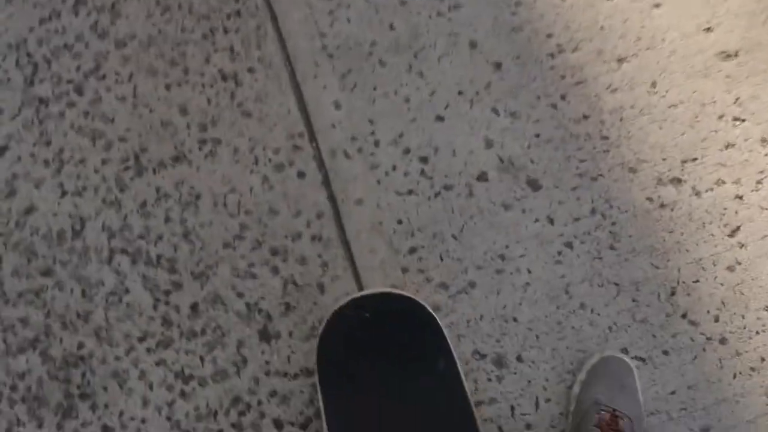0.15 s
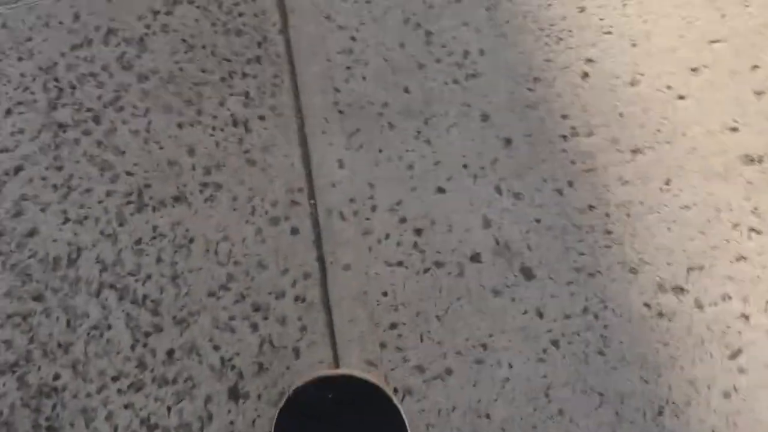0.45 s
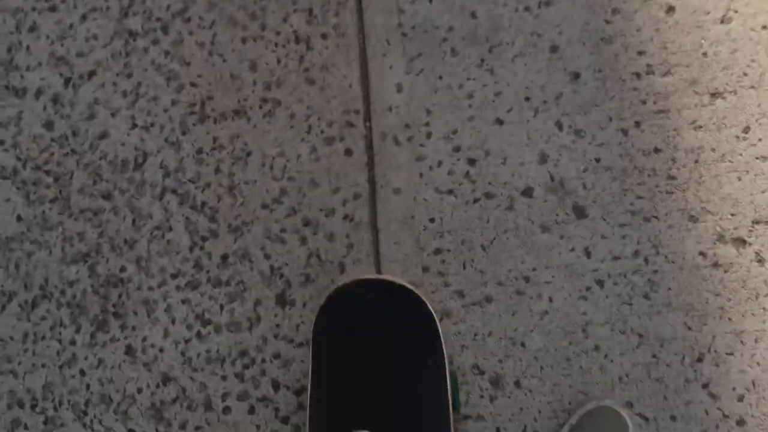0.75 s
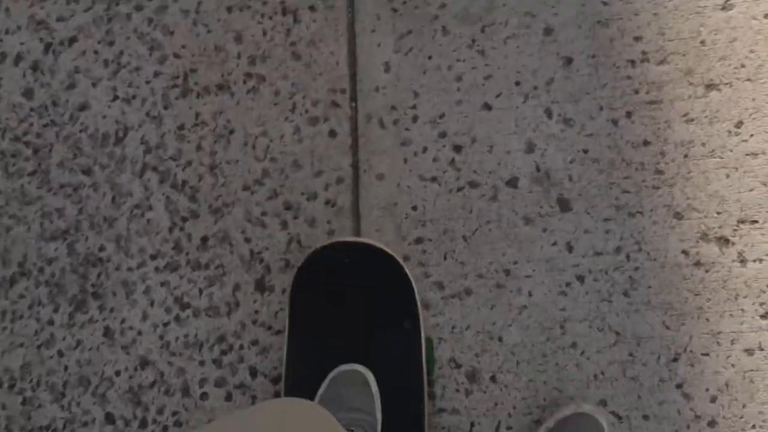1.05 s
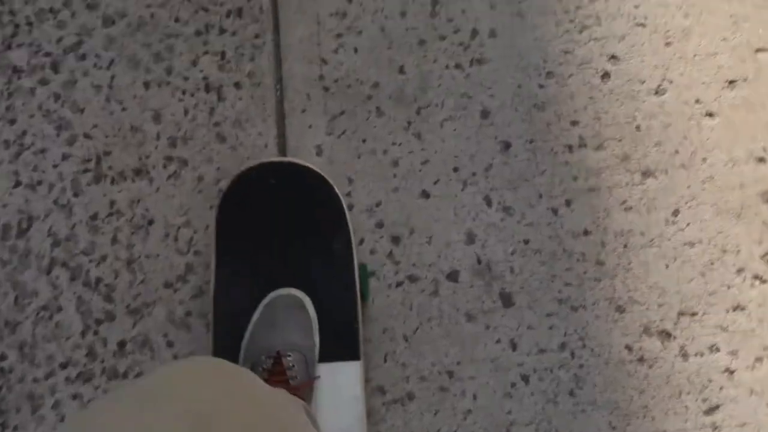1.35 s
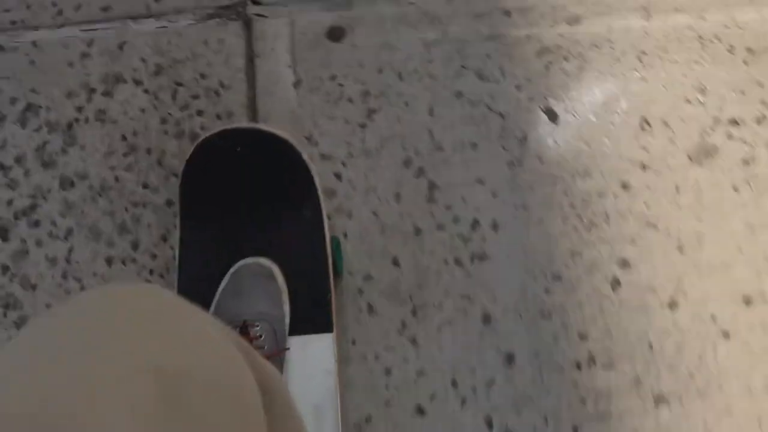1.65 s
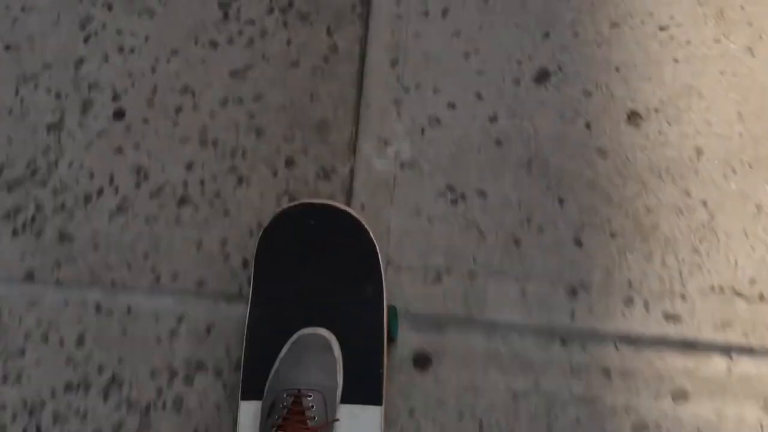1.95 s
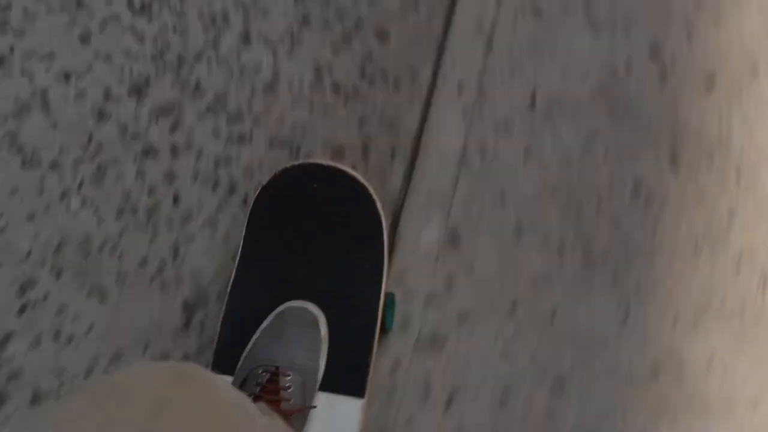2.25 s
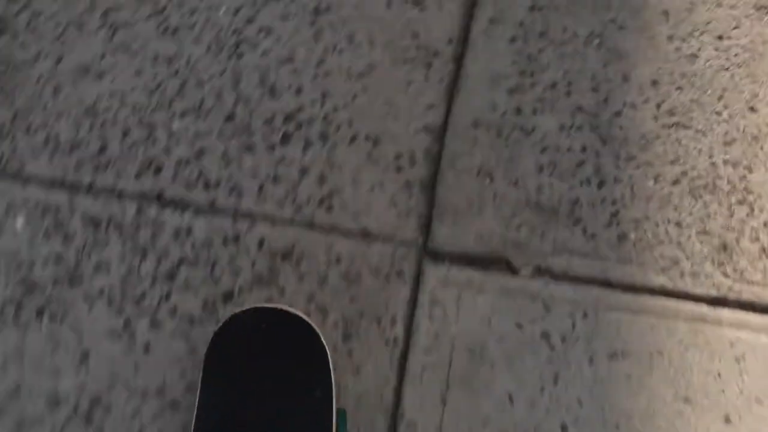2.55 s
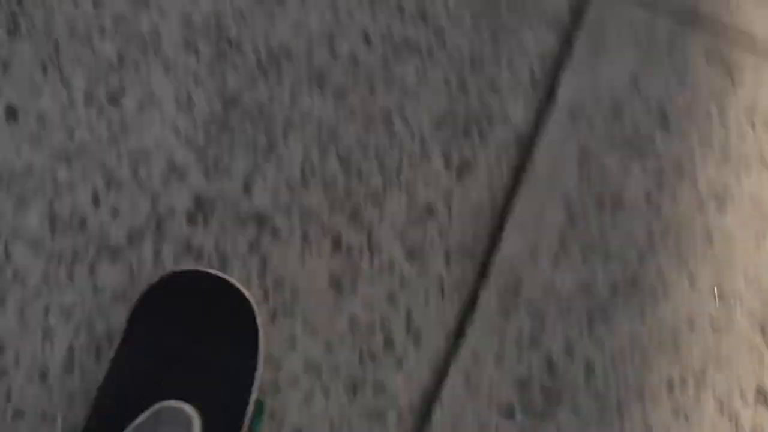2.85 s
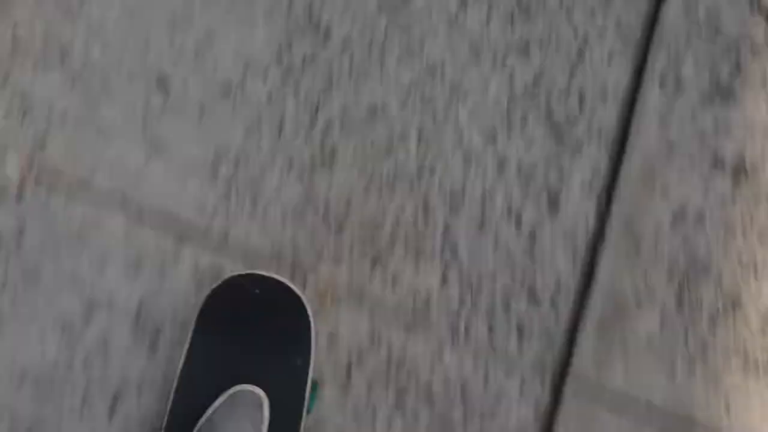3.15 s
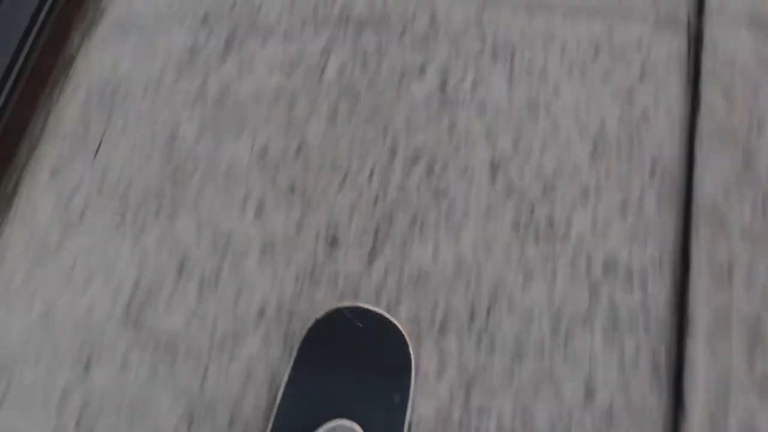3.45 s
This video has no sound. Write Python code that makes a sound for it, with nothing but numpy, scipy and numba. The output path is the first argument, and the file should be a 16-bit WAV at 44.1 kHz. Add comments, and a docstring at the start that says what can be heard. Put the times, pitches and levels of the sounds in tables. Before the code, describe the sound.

A skateboard rolls on pebbly concrete, heard close and dry from the rider's hand: steady low rumble, ringing wheel clatter, fine hiss, irregular stone rattles, hollow deck knocks and small metal pings. Two loud woody clacks, at 2.05 and 2.26 seconds, cross a slab joint. Rolling nearly fades, with a soft double bump around 2.55, then swells coarser and duller from 2.7, peaking near 3.2; a faint rising squeak starts at 3.55.

```python
"""Pebbly concrete paving: a skateboard rolls over it, heard from the rider's hand.
Random grit contacts, filtered, shake the deck, ring the wheels and hiss; stones make short rattles.
Pits knock hollow deck modes; the trucks ping. Both axles clack over a slab joint, a smooth slab
passes quietly with a soft bump, then coarser, duller paving follows; a squeak rises at the end."""
import sys
import numpy as np
from scipy import signal
from scipy.fft import rfft, irfft
from scipy.io import wavfile
from scipy.ndimage import uniform_filter1d
from numba import njit

SR = 44100
rng = np.random.default_rng(int(sys.argv[2]) if len(sys.argv) > 2 else 0)


def log_audio(samples):
    """Write samples as a 16-bit WAV file to the path given in sys.argv[1]."""
    # one column per channel
    frames = np.atleast_2d(samples).T
    # limit to full scale, then quantise
    limited = np.clip(frames, -1, 1)
    pcm = np.round(limited * 32767).astype(np.int16)
    wavfile.write(sys.argv[1], SR, pcm)


N = 158760

# Rolling level before gains and jolts. Each row: time in seconds, rumble in dB, deck in dB, wheels in dB.
ROLL_LEVELS = [(0, -26, -26, -25), (0.5, -25, -26.5, -22.5), (0.75, -25, -28.5, -23.5),
               (0.95, -24.5, -30.5, -27.5), (1.15, -22.5, -27, -26.5), (1.5, -21.5, -26.5, -27.5),
               (2.03, -20.5, -27, -25), (2.1, -30, -33.5, -36), (2.2, -27, -25, -33),
               (2.33, -31.5, -35, -42), (2.47, -36, -45, -44), (2.6, -29.5, -36.5, -39.5),
               (2.72, -26.5, -27, -33), (2.86, -24, -21.5, -31.5), (3.03, -23.5, -34, -34.5),
               (3.2, -18, -15.5, -28.5), (3.36, -23.5, -27, -35.5), (3.6, -22, -24.5, -34.5)]
# Gain added to the rolling levels: rumble, deck and wheels in dB.
ROLL_GAINS_DB = (-1, 0, -3)
# Stones and pits. Each row: start in seconds, rumble in dB, deck in dB, wheels in dB, rattle decay in seconds.
STONES = [(0.101,-37,-25.5,-31,0.0077),(0.64,-19,-30,-18.5,0.029),(.713,-19.5,-28,-22.5,0.0085),(0.726,-40,-24.5,-20,0.015),(0.868,-22.5,-19.5,-20.5,0.011),(1.264,-24,-17.5,-20,0.014),(1.378,-50,-17.5,-37,0.013),(1.434,-21.5,-19,-22.5,0.012),(1.534,-23,-14,-42,0.0089),(1.595,-38,-17,-29,0.0047),(1.67,-21,-16.5,-26.5,0.031),(1.876,-46,-26,-20.5,0.013),(2.135,-42,-25,-34,0.006),(2.5,-60,-35,-43,0.012),(2.646,-31,-21.5,-41.5,0.0068),(2.767,-23,-17,-28,0.024),(2.892,-15,-14,-31,0.042),(3.137,-16.5,-22,-37,0.0046),(3.166,-16.5,-17.5,-25,0.032),(3.21,-25,-14,-31,0.018),(3.269,-22,-17,-25.5,0.016),(3.3,-15.5,-15,-31,0.014),(3.404,-50,-19,-38.5,0.0089),(3.453,-35,-16,-35,0.016),(3.477,-33,-22,-37,0.0046)]
# Slab joint, front then rear axle. Each row: start in seconds, level in dB, knock pitch in Hz,
# crack in dB relative to the body.
JOINT = [(2.0475, 5.5, 485, -20), (2.2593, 3.5, 675, -23.5)]
# Board modes beside the knock at a joint. Each row: pitch in Hz, T60 in seconds, level in dB.
BOARD_MODES = [(247.5, 0.15, -17.5), (325, 0.083, -13.5), (430, 0.089, -20.5), (585, 0.058, -13),
               (869, 0.066, -22.5), (1230, 0.04, -16), (2400, 0.024, -27)]
# Rumble colour on the near slab. Each row: frequency in Hz, gain in dB.
NEAR_RUMBLE = [(52, -11), (70, 0.5), (90, -5.5), (165, 4.5), (228, 2), (275, -2.5), (400, -5.5), (560, -12)]
# Rumble colour of the paving beyond the joint. Each row: frequency in Hz, gain in dB.
FAR_RUMBLE = [(50, -18.5), (100, -0.5), (180, 0), (275, 2), (360, -2.5), (470, 2), (600, -15)]
# Deck colour. Each row: frequency in Hz, gain in dB.
DECK = [(250, -30.5), (400, -11.5), (480, -0.5), (560, -1.5), (635, 3), (740, -2), (880, -7), (1050, -11.5),
        (1400, -30)]
# Wheel colour. Each row: frequency in Hz, gain in dB.
WHEEL = [(600, -33.5), (940, 2.5), (1100, 8), (1380, 4.5), (1620, 2), (1785, -3.5), (2070, -0.5),
         (2300, -6.5), (2570, -7.5), (3100, -15.5)]
# Hiss colour. Each row: frequency in Hz, gain in dB.
HISS = [(1500, 9), (2800, 7.5), (3600, 4), (4600, -1), (6500, -4), (11500, -19), (13200, -36)]
# Wheel resonance centres before random wander. Each row: time in seconds, lower in Hz, upper in Hz.
WHEEL_CENTRES = [(0, 1524, 2020), (.28, 1490, 1860), (.5, 1234, 1720), (1.3, 1304, 1780), (1.8, 960, 1726)]
# Stereo width. Each row: frequency in Hz, side relative to mid in dB.
WIDTH = [(150, -58), (700, -35), (1400, -25), (2600, -13.5), (8000, 1.5), (14000, 12)]
# Metal pings of the trucks. Each row: start in seconds, pitch in Hz, level in dB.
PINGS = [(0.496, 1860, -13), (0.729, 1820, -8), (0.869, 3830, -22), (1.264, 1940, -12), (1.877, 1750, -5),
         (2.398, 1660, -37), (2.501, 1730, -27.5), (2.581, 1770, -31), (2.694, 1790, -24)]
# Squeak: base pitch in Hz, level in dB.
SQUEAK = (410, -31.5)
# Squeak partials. Each row: multiple of the base pitch, level in dB relative to the squeak.
SQUEAK_PARTIALS = [(3, 1), (5, -1.5), (6, -12)]
# Soft low bump on the smooth slab: pitch in Hz, T60 in seconds, level in dB.
BUMP = (114, 0.067, -16.5)
# Hollow deck knocks over small pits. Each row: start in seconds, level in dB, pitch in Hz.
KNOCKS = [(0.807, -10.5, 720), (1.08, -11.5, 480), (1.626, -9, 610), (3.239, -8.5, 720)]

GRIT_PER_S, GRIT_SPREAD_DB = 2600, 1
FINE_GRIT_PER_S, FINE_SPREAD_DB = 12000, 1
STONE_GRIT_PER_S, STONE_SPREAD_DB = 3000, 3.3
TICKS_PER_S, TICK_SPREAD_DB = 430, 2.8
JOLT_PER_S, JOLT_RMS_DB = 77, 1.5
STRIKE_AMPLITUDE = 0.21  # first blow; the chatter that follows has unit energy
STRIKE_S = 0.022  # time over which a stone's level is taken
HISS_DB, STONE_HISS_DB = -11, -13  # relative to the wheels
RESONANCE_WIDTH_HZ = 75.0  # wheels and deck
WHEEL_WANDER_RMS, WHEEL_WANDER_PER_S = 0.04, 32  # log pitch, steps per second
UPPER_RING_DB = -3  # relative to the lower resonance
WHEEL_RING_DB, WHEEL_RING_FADE_DB_PER_S = 4, 3  # ring relative to clatter, at time zero
DECK_RING_HZ, DECK_RING_DB = 620, -5.5  # centre; level relative to the deck body
DECK_WANDER_RMS, DECK_WANDER_PER_S = 0.17, 11  # log pitch, steps per second
KNOCK_T60_S, HOLLOW_T60_S, PING_T60_S = 0.023, 0.055, 0.031
SECOND_WHEEL_S, SECOND_WHEEL_DB = 0.0098, -8  # relative to the axle's first wheel
BUMP_S, BUMP_REBOUND_S, BUMP_REBOUND_DB = 2.535, 0.0542, -5  # start, then rebound after it
SQUEAK_S, SQUEAK_SWELL_S, SQUEAK_RISE_PER_S = 3.555, 0.028, 0.62  # rise is a share of base pitch
SKIRT_DB_PER_OCT = 12.5  # fall above a colour's last point
CLIP_LEVEL, TOP_HZ = 1.0, 12800


def undb(db):
    """Amplitude from dB."""
    return 10 ** (np.asarray(db) / 20)


def unit(x):
    """Scale to an RMS of 1."""
    return x / np.sqrt(np.mean(x ** 2) + 1e-18)


def curve(rows, axis=1):
    """One table column interpolated over time."""
    rows = np.array(rows)
    return np.interp(np.arange(N) / SR, rows[:, 0], rows[:, axis])


def response(points, size=4096):
    """Minimum-phase impulse response of a colour, by folding its cepstrum."""
    hz, db = np.array(points).T
    f = np.maximum(np.arange(size // 2 + 1) * SR / size, 1)
    skirt_db = SKIRT_DB_PER_OCT * np.maximum(np.log2(f / hz[-1]), 0)
    gain_db = np.interp(np.log(f), np.log(hz), db) - skirt_db
    cepstrum = irfft(np.log(undb(gain_db)))
    cepstrum[1:size // 2] *= 2
    cepstrum[size // 2 + 1:] = 0
    return irfft(np.exp(rfft(cepstrum)))


def through(x, impulse_response):
    """Filter, keeping the input length."""
    return signal.fftconvolve(x, impulse_response)[:len(x)]


def walk(steps_per_s):
    """Random levels, each held one step and slewed to the next; RMS 1."""
    step = max(int(SR / steps_per_s), 2)
    held = rng.standard_normal(N)[np.arange(N) // step]
    return unit(uniform_filter1d(held, step))


def add(out, start_s, sound):
    """Mix a sound in at its start, cut at the end of the scene."""
    i = max(int(start_s * SR), 0)
    out[i:i + len(sound)] += sound[:N - i]


@njit
def resonate(x, hz, width_hz):
    """State-variable band-pass with a moving centre."""
    y, band, low = np.empty(len(x)), 0., 0.
    for i in range(len(x)):
        g = np.tan(np.pi * hz[i] / SR)
        k = width_hz / hz[i]
        v = (band + g * (x[i] - low)) / (1 + g * (g + k))
        band = 2 * v - band
        low = low + 2 * g * v
        y[i] = k * v
    return y


def ring(hz, t60_s, size=6000):
    """One exponentially decaying mode."""
    t = np.arange(size) / SR
    return -np.sin(2 * np.pi * hz * t) * np.exp(-np.log(1000) * t / t60_s)


def soft_ring(hz, t60_s):
    """A mode with its onset softened by subtracting a ten times shorter one."""
    return ring(hz, t60_s) - ring(hz, t60_s / 10)


def grit(per_s, spread_db, size):
    """Tiny contacts at random moments with random sign, a few much harder than the rest."""
    touch = rng.random(size) < per_s / SR
    force = undb(spread_db * np.minimum(rng.exponential(size=size), 5))
    return unit(touch * force * np.sign(rng.standard_normal(size)))


def truck_pings():
    """Truck metal pings and ticks: one short decaying mode each."""
    out = np.zeros(N)
    for start_s, hz, db in PINGS:
        add(out, start_s, undb(db) * ring(hz, PING_T60_S))
    return out


def wheel_squeak():
    """A wheel squeak: harmonic partials that swell and rise in pitch."""
    out, t = np.zeros(N), np.arange(N) / SR
    base_hz, db = SQUEAK
    hz = base_hz * (1 + SQUEAK_RISE_PER_S * (t - SQUEAK_SWELL_S))
    phase = 2 * np.pi * np.cumsum(hz) / SR
    tone = sum(undb(partial_db) * np.sin(k * phase) for k, partial_db in SQUEAK_PARTIALS)
    swell = np.minimum(t / SQUEAK_SWELL_S, 1) ** 2
    add(out, SQUEAK_S, undb(db) * swell * tone)
    return out


def bump():
    """A soft low thump and its weaker rebound, each one damped mode."""
    out = np.zeros(N)
    hz, t60_s, db = BUMP
    thump = undb(db) * soft_ring(hz, t60_s)
    add(out, BUMP_S, thump)
    add(out, BUMP_S + BUMP_REBOUND_S, undb(BUMP_REBOUND_DB) * thump)
    return out


def knocks():
    """A wheel dips into a pit and the deck answers with one hollow note."""
    out = np.zeros(N)
    for start_s, db, hz in KNOCKS:
        add(out, start_s, undb(db) * soft_ring(hz, HOLLOW_T60_S))
    return out


def joint(size=6000):
    """Each axle drops in, one wheel just after the other: a knock, deck modes and a noise crack."""
    out, t = np.zeros(N), np.arange(size) / SR
    onset = 1 - np.exp(-t / 0.00065)
    modes = sum(undb(mode_db) * ring(hz, t60_s) for hz, t60_s, mode_db in BOARD_MODES)
    for start_s, db, knock_hz, crack_db in JOINT:
        body = ring(knock_hz, KNOCK_T60_S) + modes
        for lag_s, wheel_db in ((0, 0), (SECOND_WHEEL_S, SECOND_WHEEL_DB)):
            scrape = rng.standard_normal(size) * np.exp(-t / 0.011)
            crack = through(scrape, response(WHEEL)) * 2.15 + through(scrape, response(HISS)) * 0.027
            clack = (body + undb(crack_db) * crack) * onset
            add(out, start_s + lag_s, undb(db + wheel_db) * clack)
    return out


def stones(size=6000):
    """A wheel strikes a stone and chatters: a blow and fading grit shake rumble, deck and wheels, plus hiss."""
    out, t = np.zeros(N), np.arange(size) / SR
    level = np.sqrt(STRIKE_S * SR / size)
    for start_s, rumble_db, deck_db, wheel_db, decay_s in STONES:
        fade = np.exp(-t / decay_s)
        rumble = FAR_RUMBLE if start_s > JOINT[0][0] else NEAR_RUMBLE
        for colour, db in ((rumble, rumble_db), (DECK, deck_db), (WHEEL, wheel_db)):
            chatter = unit(grit(STONE_GRIT_PER_S, STONE_SPREAD_DB, size) * fade) / np.sqrt(size)
            force = chatter + STRIKE_AMPLITUDE * (t == 0)
            add(out, start_s, unit(through(force, response(colour))) * undb(db) * level)
        envelope = np.exp(-t / (decay_s + 0.0041)) * (1 - np.exp(-t / 0.0024))
        scuff = rng.standard_normal(size) * envelope
        hiss = unit(through(scuff, response(HISS)))
        add(out, start_s, hiss * undb(wheel_db + STONE_HISS_DB) * level)
    return out


def rumble():
    """Grit shakes the board at low frequency; the colour changes as the front axle meets the joint."""
    near, far = (unit(through(grit(GRIT_PER_S, GRIT_SPREAD_DB, N), response(colour)))
                 for colour in (NEAR_RUMBLE, FAR_RUMBLE))
    beyond_joint = np.arange(N) / SR > JOINT[0][0]
    return np.where(beyond_joint, far, near)


def deck():
    """Grit shakes the deck; a hollow resonance near 620 Hz wanders at random in pitch."""
    force = grit(GRIT_PER_S, GRIT_SPREAD_DB, N)
    body = unit(through(force, response(DECK)))
    centre_hz = DECK_RING_HZ * np.exp(DECK_WANDER_RMS * walk(DECK_WANDER_PER_S))
    hollow = resonate(body, centre_hz, RESONANCE_WIDTH_HZ)
    return body + undb(DECK_RING_DB) * unit(hollow)


def wheels():
    """Pebbles tick against the wheels; each tick rings two wandering resonances, over a fine hiss."""
    ticks = grit(TICKS_PER_S, TICK_SPREAD_DB, N)
    centres_hz = (curve(WHEEL_CENTRES, axis=k) * np.exp(WHEEL_WANDER_RMS * walk(WHEEL_WANDER_PER_S))
                  for k in (1, 2))
    lower, upper = (unit(resonate(ticks, hz, RESONANCE_WIDTH_HZ)) for hz in centres_hz)
    ring_band = signal.butter(2, (800, 2600), "bandpass", fs=SR, output="sos")
    tone = signal.sosfilt(ring_band, lower + undb(UPPER_RING_DB) * upper)
    # fresh signs make the clatter independent of the tone
    clatter = unit(through(ticks * np.sign(rng.standard_normal(N)), response(WHEEL)))
    hiss = unit(through(grit(FINE_GRIT_PER_S, FINE_SPREAD_DB, N), response(HISS)))
    sing = undb(WHEEL_RING_DB - WHEEL_RING_FADE_DB_PER_S * np.arange(N) / SR)
    clatter_and_tone = (clatter + sing * unit(tone)) / np.hypot(1, sing)
    return clatter_and_tone + undb(HISS_DB) * hiss


def rolling():
    """Grit drives rumble, deck and wheels; the uneven ground jolts all their levels together."""
    out = np.zeros(N)
    jolt_db = JOLT_RMS_DB * walk(JOLT_PER_S)
    for k, part in enumerate((rumble(), deck(), wheels())):
        level_db = curve(ROLL_LEVELS, axis=k + 1) + ROLL_GAINS_DB[k] + jolt_db
        out += unit(part) * undb(level_db)
    return out


def scene():
    """Bass nearly equal on both sides, treble scattered; bump, pings and squeak central."""
    mid, scatter = (rolling() + stones() + knocks() + joint() for _ in range(2))
    mid += bump()
    side = through(scatter, response(WIDTH))
    return np.array([mid + side, mid - side]) + truck_pings() + wheel_squeak()


def record(dry):
    """Peaks clip on overload, then a steep low-pass cuts the top."""
    low_pass = signal.ellip(8, .2, 70, TOP_HZ, fs=SR, output="sos")
    return signal.sosfilt(low_pass, np.clip(dry, -CLIP_LEVEL, CLIP_LEVEL))


dry = scene()
out = record(dry)
log_audio(out)
```